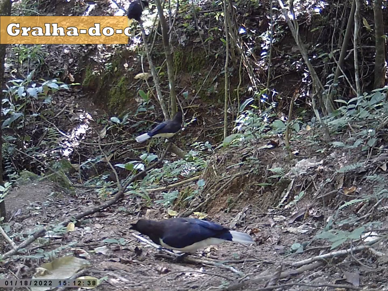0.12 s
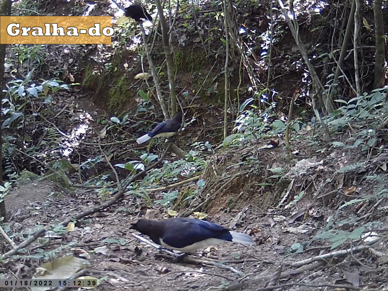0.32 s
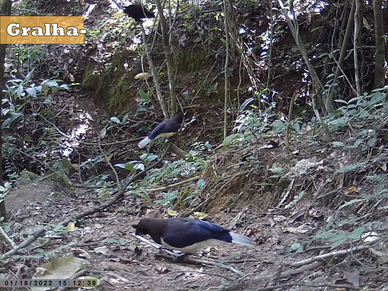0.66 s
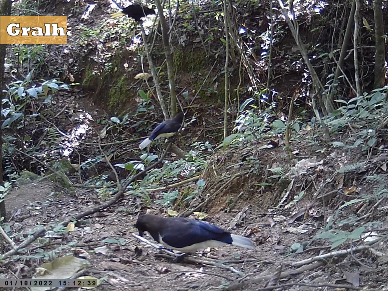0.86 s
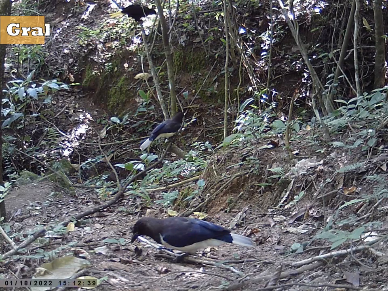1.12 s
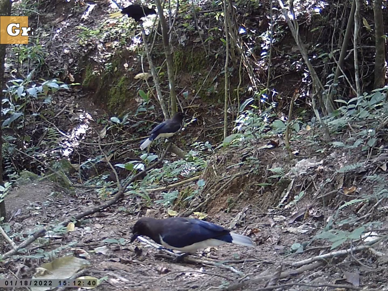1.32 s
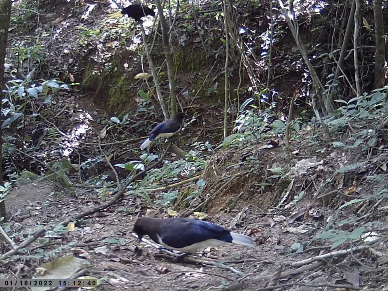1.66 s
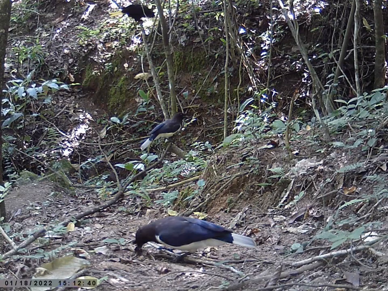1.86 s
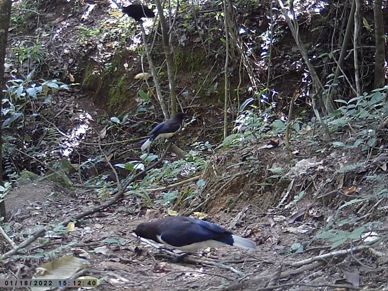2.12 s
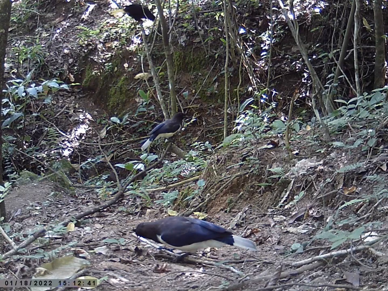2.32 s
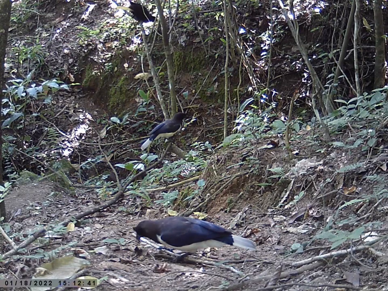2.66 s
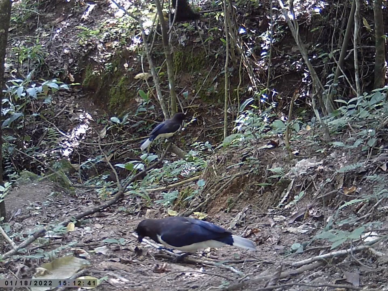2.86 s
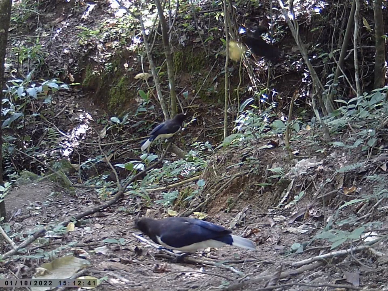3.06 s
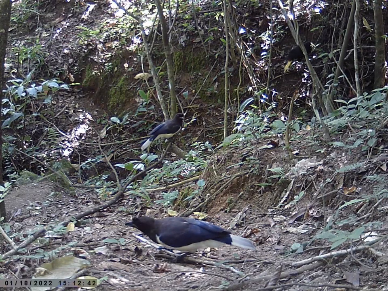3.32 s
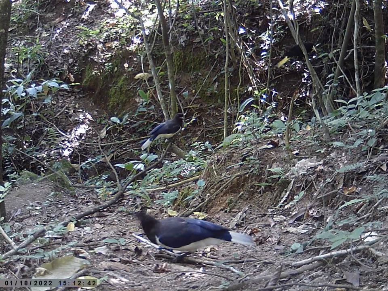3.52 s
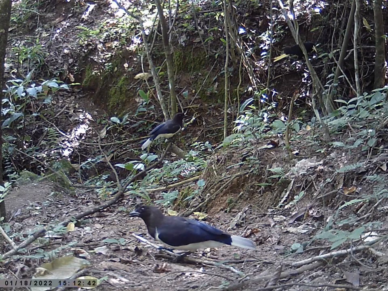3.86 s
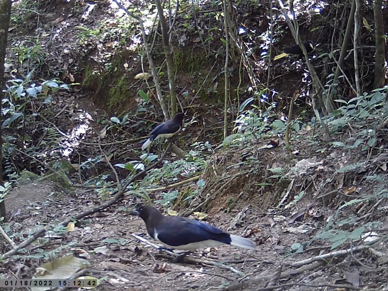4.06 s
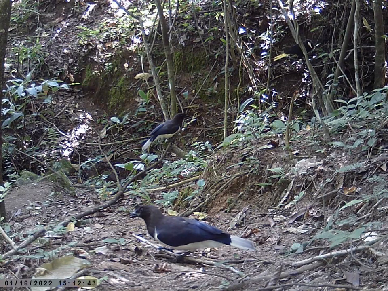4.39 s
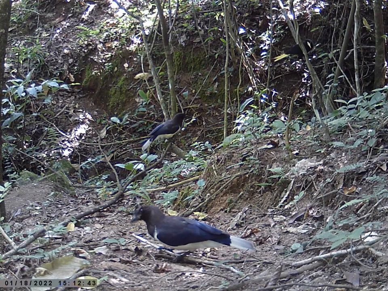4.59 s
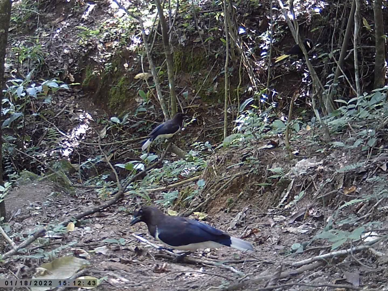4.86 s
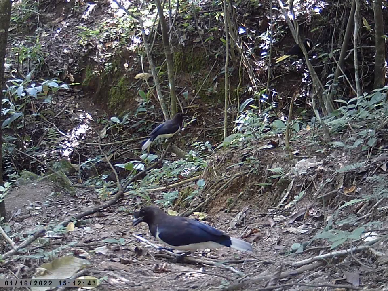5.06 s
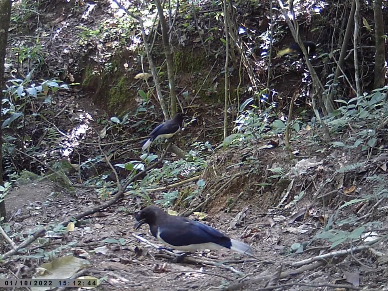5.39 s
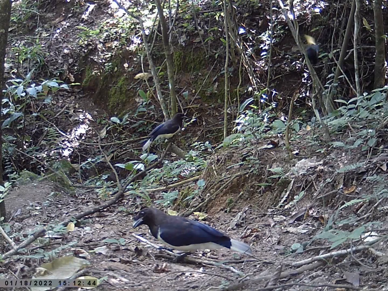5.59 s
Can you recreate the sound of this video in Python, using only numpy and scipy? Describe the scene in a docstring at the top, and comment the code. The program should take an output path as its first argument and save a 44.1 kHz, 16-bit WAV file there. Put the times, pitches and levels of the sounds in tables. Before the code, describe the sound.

From 0 to 2.7 s the woodland is quiet: low outdoor rumble, soft camera hiss with a thin high whine, small grainy feather rustles mostly before 0.7 s, and faint distant birds giving raspy cheeps, low notes and falling whistles. At 2.8 s leaves begin to stir and tiny twigs tick. At 2.95 s a large bird takes off with a rustle, beating about eleven times a second; the flaps are faint at first, then swell sharply after 3.35 s and stop near 3.7 s. A bright, sharp snap cuts in at 3.23 s. From 3.93 to 4.3 s a second run of four or five flaps passes very close, breathy and thumping. Leaves keep hissing. Low flutter follows, with the strongest deep buffet on the microphone at 4.73 s and weaker bumps until 5.45 s. Two faint whistles fall at 4.26 and 4.6 s, with small chirps near 5 s and dry snaps at 5.05 to 5.6 s.

```python
"""Jay in flight past a woodland camera

A jay leaves its perch in a wood and flies past a trail camera in two runs of wing beats, over eleven a second.
Each downstroke is a burst of feather noise, a clack, a resonant whoosh and a pressure wave; a swish joins them.
Eddies of the wake then buffet the microphone as low, unsteady oscillations inside bell-shaped envelopes.
Leaves hiss and tick as coloured noise and clicks, twigs snap as resonant bursts, far birds whistle as gliding
sines, and the camera adds hiss and thin bands of whine over a low outdoor rumble."""
import sys
import numpy as np
from scipy import signal
from scipy.fft import rfft, irfft, next_fast_len
from scipy.io import wavfile

SR = 44100
rng = np.random.default_rng(int(sys.argv[2]) if len(sys.argv) > 2 else 0)


def generate_wav(signal):
    """Clip the signal to [-1, 1] and save it as 16-bit WAV at the path in sys.argv[1]."""
    frames = np.transpose(np.atleast_2d(signal))
    scaled = np.clip(frames, -1, 1) * 32767
    pcm = np.round(scaled).astype(np.int16)
    wavfile.write(sys.argv[1], SR, pcm)


N = 251810
TIME = np.arange(N) / SR


def undb(db):
    """Logarithmic level: decibels to amplitude gain."""
    return 10 ** (np.asarray(db) / 20)


def unit(x):
    """Mean power: scale to an rms of one."""
    return x / np.sqrt(np.mean(x ** 2))


def curve(rows):
    """Envelope: gain over time, linear in decibels between (s, dB) rows."""
    return undb(np.interp(TIME, *np.transpose(rows)))


def noise():
    """White noise: equal power at all frequencies, for the whole scene."""
    return rng.standard_normal(N)


def lowpass(x, order, cutoff_hz):
    """Low-pass filtering: pass the slow variations only."""
    return signal.sosfilt(signal.butter(order, cutoff_hz, fs=SR, output="sos"), x)


def colour(x, points):
    """Spectral shaping: weight the spectrum by (Hz, dB) points on a log frequency axis; rms one."""
    hz, db = np.transpose(points)
    size = next_fast_len(N)
    bins_hz = np.maximum(np.arange(size // 2 + 1) * SR / size, 1)
    gain = undb(np.interp(np.log(bins_hz), np.log(hz), db))
    return unit(irfft(rfft(x, size) * gain, size)[:N])


def resonate(x, hz, width):
    """Resonance: one peak of gain one at its centre."""
    b, a = signal.iirpeak(min(hz, SR / 2 - 1), hz / min(width, SR / 4), fs=SR)
    return signal.lfilter(b, a, x)


def resonate_twice(x, hz, width, second_width):
    """Cascaded resonance: two peaks in series fall away more steeply than one."""
    return resonate(resonate(x, hz, width), hz, second_width)


def swell(at, length):
    """Gaussian envelope: the samples around a moment and a bell over them."""
    span = slice(max(int((at - 2 * length) * SR), 0), min(int((at + 2 * length) * SR), N))
    return span, np.exp(-2 * ((TIME[span] - at) / length) ** 2)


def click(burst, at, decay, hz, width):
    """Impulsive excitation: the samples after a moment and a fading burst of resonant noise over them."""
    start = int(at * SR)
    span = slice(start, start + SR // 20)
    fade = np.exp(-(TIME[span] - TIME[start]) / decay)
    snap = resonate_twice(burst[span] * fade, hz, width, width)
    return span, unit(snap) * np.sqrt(2 * np.mean(fade ** 2))


def crackle(rate, spread_db):
    """Shot noise: random tiny clicks of very unequal size, `rate` per second on average; rms one."""
    clicks = (rng.random(N) < rate / SR) * noise()
    return unit(clicks * undb(spread_db * np.minimum(rng.exponential(size=N), 4)))


def wander(rate):
    """Slow modulation: smooth random variation below `rate` Hz, with a spread of one."""
    return unit(lowpass(noise(), 2, rate))


# The jay comes closer, passes the microphone and eases off to land: start_s, distance_m [m], effort_db [dB],
# whoosh_hz (centre) [Hz]
PATH = [(2.94, 8.8, 5, 930), (3.3, 13.4, 9.5, 816), (3.39, 3.7, 5, 614), (3.57, 1.2, 0, 720),
        (3.67, 1.36, 1, 383), (3.93, 0.92, -0.5, 380), (4.1, 0.49, -2.5, 650), (4.191, 0.65, -6, 342),
        (4.28, 1.5, -10.5, 675)]


def flight():
    """Moving source: distance in m, effort as a gain and whoosh centre in Hz over time."""
    at, *columns = np.transpose(PATH)
    metres, effort_db, whoosh_hz = (np.interp(TIME, at, column) for column in columns)
    return metres, undb(effort_db), whoosh_hz


# Runs of even wing beats: start_s (first downstroke) [s], end_s (wings folded) [s], rate_hz [beats per s]
FLIGHTS = [(2.947, 3.717, 11.24), (3.927, 4.298, 11.72)]


def wing_cycle(lead_beats=0.4, fade_s=0.067):
    """Periodic motion: the wing phase, zero at each downstroke, and a gate that is open while they beat."""
    phase, beating = np.zeros(N), np.zeros(N)
    for first, end, rate in FLIGHTS:
        time_inside = np.minimum(TIME - first + lead_beats / rate, end - TIME)
        gate = np.clip(time_inside / fade_s + .5, 0, 1)
        phase = np.where(gate > 0, 2 * np.pi * rate * (TIME - first), phase)
        beating += gate
    return phase, beating


# Spectrum of feathers rubbing: pitch_hz [Hz], level_db [dB]
FEATHER = [(40, 7), (130, 9), (280, 4), (430, -5), (800, -17), (950, -19), (1300, -3.5), (2000, -4),
           (4000, -8), (6600, -3), (9500, -8), (12000, -14.5), (15500, -39)]
# Levels at 1 m; effort is added to the rub and the clack
RUB_DB, WHOOSH_DB, CLACK_DB = -44.5, -49.5, -56
ATTACK_S, RELEASE_S, CLACK_S = 0.0029, 0.019, 0.0035  # rise and fall of the rub; decay of the clack
WHOOSH_LAG_S, WHOOSH_S = 0.0061, 0.015  # the whoosh swells just after the stroke begins


def downstrokes(barb_share=0.92, flutter_db=1.5, flutter_hz=130, whoosh_width=0.83, clack_hz=3000, clack_width=6180):
    """Friction and flow noise: a stroke clacks quills, rubs feathers and whooshes, falling as 1 / distance."""
    metres, effort, whoosh_hz = flight()
    out, air = np.zeros(N), noise()
    feathers = colour(noise() + barb_share * crackle(rate=3100, spread_db=2.5), FEATHER)
    feathers *= undb(flutter_db * wander(flutter_hz))  # the vanes flutter in the flow
    for at in np.concatenate([np.arange(first, end, 1 / rate) for first, end, rate in FLIGHTS]):
        now = int(at * SR)
        span, clack = click(feathers, at, CLACK_S, clack_hz, clack_width)
        age = TIME[span] - TIME[now]
        stroke = -np.expm1(-age / ATTACK_S) * np.exp(-(age / RELEASE_S) ** 2)
        rub = stroke * feathers[span]
        out[span] += effort[now] * (undb(RUB_DB) * rub + undb(CLACK_DB) * clack) / metres[now]
        span, bell = swell(at + WHOOSH_LAG_S, WHOOSH_S)
        hz = whoosh_hz[now]
        width = hz * whoosh_width
        whoosh = unit(resonate_twice(air[span], hz, width, 2 * width))
        out[span] += undb(WHOOSH_DB) * bell * whoosh / metres[now]
    return out


# Spectrum shared by the wing swish and the leaves: pitch_hz [Hz], level_db [dB]
HISS = [(40, -25), (130, 3), (300, -1), (430, 2), (780, -3), (950, 1.5), (1300, -3), (2000, -3),
        (4200, -4.5), (6800, 1), (10000, -5), (12500, -17.5), (15500, -24)]
SWISH_DB = -53  # at 1 m, before effort and the rise and fall with each beat
SWISH_LAG_S, SWISH_DEPTH_DB = 0.033, 3  # the swish peaks just after each downstroke


def swish():
    """Amplitude modulation: a grainy hiss rises and falls with the beat and lasts between strokes."""
    metres, effort, _ = flight()
    phase, beating = wing_cycle()
    late_phase = np.interp(TIME - SWISH_LAG_S, TIME, phase)
    level = undb(SWISH_DB + SWISH_DEPTH_DB * np.cos(late_phase))
    hiss = colour(noise() + 0.48 * crackle(rate=2000, spread_db=9.0), HISS)
    return beating * effort / metres * level * hiss * undb(2.84 * wander(72))


def pressure_wave(level_db=-37, sharpness=2.1, lag_s=.012):
    """Near field: pressure rises on downstrokes, drops sharply as wings lift, and falls as 1 / distance squared."""
    phase, beating = wing_cycle()
    metres = flight()[0]
    suction = np.exp(-sharpness * (1 + np.cos(phase)))
    in_flight = suction[beating > 0]
    swing = beating * (in_flight.mean() - suction) / in_flight.std()
    return undb(level_db) * np.interp(TIME - lag_s, TIME, swing) / metres ** 2


# Eddies of the wake at the microphone: start_s (centre) [s], level_db [dB], length_s [s],
# buffet_hz (before the flow's unsteadiness) [Hz]
EDDIES = [(4.258, -33.5, 0.028, 32), (4.46, -33.5, 0.12, 12.6), (4.733, -16.5, 0.034, 36),
          (4.744, -18.5, 0.015, 96), (4.805, -24.5, .028, 31), (4.888, -28, 0.029, 68),
          (4.939, -26, 0.029, 99), (5.148, -26.5, 0.038, 49), (5.436, -27.5, 0.031, 39),
          (5.56, -41, .11, 19.5)]
# Spectrum of slow moving air: pitch_hz [Hz], level_db [dB]
AIR = [(12, 3), (28, -4), (60, -5.5), (120, -20), (250, -32), (600, -61), (2000, -73)]
DRAUGHT_DB, DRAUGHT_LAG_S, DRAUGHT_S = -17, 0.058, 0.16  # draught trailing each eddy, relative to it
WASH_DB = -39  # draught under the wings at 1 m


def wake(unsteady=0.5, cascade_db=-16, cascade_hz=135):
    """Turbulent cascade: eddies suck at the core, rock the air and break into faster ones; a draught follows."""
    draught = colour(noise(), AIR)
    out = undb(WASH_DB) * wing_cycle()[1] / flight()[0] * draught
    flow_speed = np.exp(unsteady * np.tanh(wander(64)))  # the flow speeds up and slackens
    travel = np.cumsum(flow_speed) / SR
    small = unit(lowpass(noise(), 4, cascade_hz))
    for at, db, length, hz in EDDIES:
        span, bell = swell(at, length)
        roll = -np.sqrt(2) * np.cos(2 * np.pi * hz * (travel[span] - travel[int(at * SR)]))
        fragments = undb(cascade_db) * bell * hz / 50 * small[span]  # stronger in faster eddies
        out[span] += undb(db) * bell * (roll + fragments)
        span, bell = swell(at + DRAUGHT_LAG_S, DRAUGHT_S)
        out[span] += undb(db + DRAUGHT_DB) * bell * draught[span]
    return out


# Level of the foliage that the jay stirs: start_s [s], level_db [dB]
FOLIAGE = [(2.78, -73), (2.9, -63.5), (3.8, -64.5), (4.25, -59.5), (4.56, -60.5), (4.9, -59.5),
           (5.26, -63.5), (5.31, -68.5), (5.71, -64)]


def foliage(tick_share=.35, patchy_db=2.5):
    """Many small impacts: stirred leaves hiss in uneven patches and tick against each other."""
    leaves = noise() + .5 * crackle(rate=2000, spread_db=3.5)
    leaves += tick_share * crackle(rate=120, spread_db=2.5)
    return curve(FOLIAGE) * colour(leaves, HISS) * undb(patchy_db * wander(23.5))


# Twigs and dry leaves snapping, and a strong quill clack of the jay's wing at 3.571 s: start_s [s], level_db
# [dB], # decay_s [s], pitch_hz (centre) [Hz]
SNAPS = [(2.832, -57.5, 0.0059, 3640), (2.875, -56, 0.012, 3100), (2.983, -63, .006, 2400),
         (3.2262, -45.5, 0.0012, 6760), (3.2291, -30.5, 0.00031, 6550), (3.305, -53, 0.0035, 7800),
         (3.571, -47, .0035, 1920), (3.816, -58, 0.0039, 5060), (4.904, -59, .0053, 4330),
         (5.055, -46, .0011, 7800), (5.07, -49, 0.0022, 7800), (5.269, -53, 0.0025, 6300),
         (5.457, -52.5, 0.0011, 6800), (5.549, -50.5, 0.0017, 7250), (5.600, -44.5, 0.0012, 7240),
         (5.619, -43, 0.0012, 7050)]
SNAP_WIDTH = 0.7313  # width of each of the two resonances, as a share of the centre
SPLINTER_S, SPLINTER_DB = .005, -11.5  # mean delay and relative level of the splinter after each snap


def twigs():
    """Brittle fracture: each snap is a short bright burst, followed by a weaker splinter."""
    out, burst = np.zeros(N), colour(noise(), [(9000, 17), (15000, -15)])
    for (at, db, decay, hz), chance in zip(SNAPS, rng.random(len(SNAPS))):
        for delay, drop_db in (0, 0), (SPLINTER_S * (.5 + chance), SPLINTER_DB):
            span, snap = click(burst, at + delay, decay, hz, hz * SNAP_WIDTH)
            out[span] += undb(db + drop_db) * snap
    return out


# Birds shuffling and flicking their wings: start_s (centre) [s], level_db [dB]
SHUFFLES = [(.093, -60.5), (.296, -55.5), (.389, -58), (0.533, -54.5), (.677, -59), (1.106, -65),
            (1.43, -64.5), (1.741, -60), (3.037, -47.5), (4.415, -58), (4.513, -54)]
# Spectrum of their rustle: pitch_hz [Hz], level_db [dB]
RUSTLE = [(300, -7), (1500, -6.5), (4000, -3.5), (6500, 3), (8500, -2), (15000, -25)]


def shuffles(length_s=0.021):
    """Granular friction: hopping birds make soft, finely grained rustles."""
    out, rustle = np.zeros(N), colour(crackle(rate=12000, spread_db=1.0), RUSTLE)
    for at, db in SHUFFLES:
        span, bell = swell(at, length_s)
        out[span] += undb(db) * bell * rustle[span]
    return out


# Far calls, all with columns start_s [s], length_s [s], pitch_hz (at the start) [Hz], level_db (nominal) [dB]
# Steeply falling whistles
WHISTLES = [(.47, 0.082, 5260, -74), (0.865, 0.16, 5650, -78), (1.241, .18, 5830, -74.5),
            (1.603, 0.15, 5600, -77.5), (4.264, .15, 4670, -69.5), (4.586, 0.21, 4700, -68)]
# Low, gently sagging notes
SLURS = [(0.34, 0.097, 2730, -71.5), (0.79, 0.14, 3080, -69.5), (0.876, 0.1, 2680, -72.5)]
# Level piping notes
PIPES = [(0.082, 0.032, 3350, -69), (0.083, 0.054, 4600, -70.5), (1.956, 0.198, 2653, -70.5),
         (5.242, .035, 2720, -69.5)]
# Raspy cheeps
CHEEPS = [(.226, .05, 7500, -69), (0.244, .095, 5520, -59.5), (.605, 0.048, 6300, -62),
          (1.928, 0.019, 3780, -61), (1.927, 0.028, 5980, -65.5), (2.994, 0.063, 7100, -58.5),
          (4.956, 0.066, 6570, -64)]
# A single falling chip, one row: start_s, end_s, spacing_s (longer than the span, so one chip sounds), length_s
# [s], # pitch_hz (at the start) [Hz], level_db (nominal) [dB]
FALLING_CHIP = (5.04, 5.2, 17, .026, 4008, -62.5)
# Shape of each kind: end pitch / start pitch, bend (high = glide comes early), rasp [Hz]
WHISTLE, SLUR, PIPE = (.6, 2.1, 130), (.84, -1.22, 97), (0.94, -1.56, 14)
CHEEP, CHIP_SHAPE = (0.93, 1.25, 384), (.77, 2, 140)


def small_birds(waver_db=2):
    """Frequency modulation: whistles glide in pitch, and fast random jitter turns some into raspy cheeps."""
    out, jitter, waver = np.zeros(N), wander(480), undb(waver_db * wander(54))
    first, end, spacing, *chip = FALLING_CHIP
    chips = [(at, *chip) for at in np.arange(first, end, spacing)]
    kinds = (WHISTLE, WHISTLES), (SLUR, SLURS), (PIPE, PIPES), (CHEEP, CHEEPS), (CHIP_SHAPE, chips)
    for (fall, bend, rasp), calls in kinds:
        for at, length, start_hz, db in calls:
            span = slice(int(at * SR), int((at + length) * SR))
            along = np.linspace(0, 1, span.stop - span.start)
            glide = np.expm1(-bend * along) / np.expm1(-bend)
            hz = start_hz * (1 + (fall - 1) * glide) + rasp * jitter[span]
            tone = np.sin(2 * np.pi * np.cumsum(hz) / SR)
            envelope = np.sqrt(2 * np.abs(np.sin(np.pi * along)))
            out[span] += undb(db) * envelope * waver[span] * tone
    return out


def trees(x, t60, wet_db):
    """Reverberation: trunks and the earth bank scatter a thin, sparse echo that decays 60 dB in t60 seconds."""
    age = TIME[:SR]
    scatter = rng.standard_normal(SR) * (rng.random(SR) < .05)
    echo = scatter * np.exp(-np.log(1000) * age / t60)
    return x + undb(wet_db) * signal.fftconvolve(x, echo / np.linalg.norm(echo))[:N]


# Resonances of the plastic case: pitch_hz [Hz], width_hz [Hz], level_db [dB]
HOUSING = [(595, 5, -20), (677, 13, -7), (822, 10, -7), (1200, 47, -21), (1430, 22, -20), (2140, 13, -36),
           (3200, 29, -8), (4870, 27, -21)]


def housing(x, dip_hz=1000, dip_width=200, dip_db=-8.0):
    """Cavity resonance: behind a port the camera's plastic case rings faintly and swallows one band."""
    ringing = sum(undb(db) * resonate(x, hz, width) for hz, width, db in HOUSING)
    return x + ringing - (1 - undb(dip_db)) * resonate(x, dip_hz, dip_width)


# Spectrum of the camera's hiss: pitch_hz [Hz], level_db (relative) [dB]
FLOOR = [(20, -3), (78, -4), (160, -9.5), (306, -14.5), (700, -19.5), (1040, -22.5), (2090, -25),
         (5500, -25), (6700, -20.5), (7400, -25), (8800, -25), (9900, -29.5), (14300, -28), (15500, -31.5)]
# Whine of the camera electronics: pitch_hz [Hz], width_hz (nominal) [Hz], level_db [dB]
WHINE = [(6573, 146, -70.5), (6820, 66, -78), (8560, 340, -75), (9086, 180, -74)]


def background(floor_db=-62.5, rumble_db=-60.5):
    """Stationary noise: a wavering low outdoor rumble under the camera's hiss and narrow bands of whine."""
    out = undb(floor_db) * colour(noise(), FLOOR)
    for hz, nominal_width, db in WHINE:
        width = 0.97 * nominal_width
        out += undb(db) * unit(resonate_twice(noise(), hz, width, width))
    return out + colour(noise(), AIR) * undb(rumble_db + 3.5 * wander(11.3))


def scene():
    """Superposition: the near bird is almost dry, the far ones ring among the trees."""
    near = trees(downstrokes() + swish() + foliage() + twigs() + shuffles(), t60=0.31, wet_db=-10.5)
    far = trees(small_birds(), t60=0.6, wet_db=-3)
    return (housing(near + undb(1.3) * far) + pressure_wave() + wake() + background())[None]


def record(dry, top_hz=15700):
    """Band limiting: the camera cuts the top steeply."""
    return signal.sosfilt(signal.ellip(10, .2, 80, top_hz, fs=SR, output="sos"), dry)


dry = scene()
out = record(dry)
generate_wav(out)
```